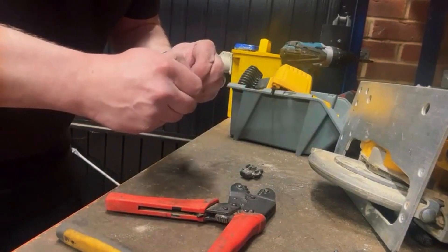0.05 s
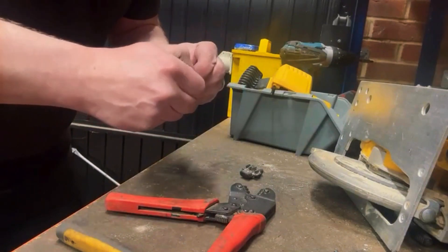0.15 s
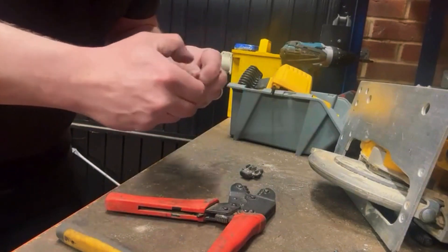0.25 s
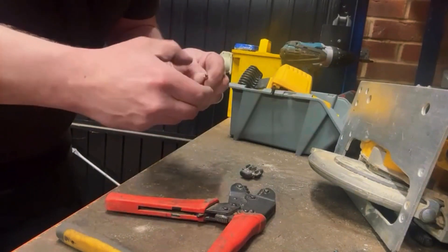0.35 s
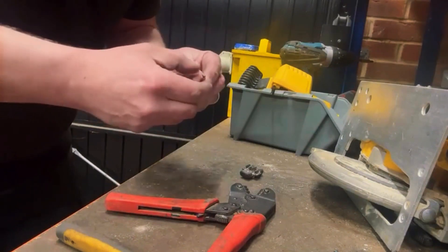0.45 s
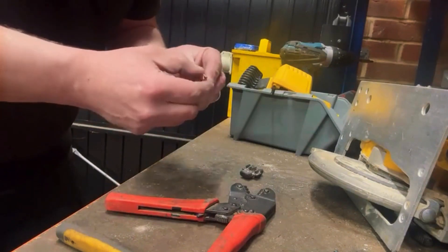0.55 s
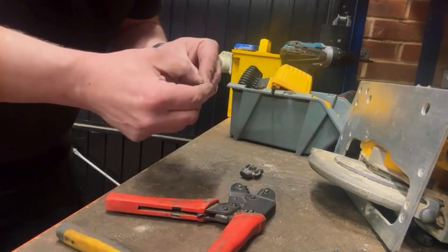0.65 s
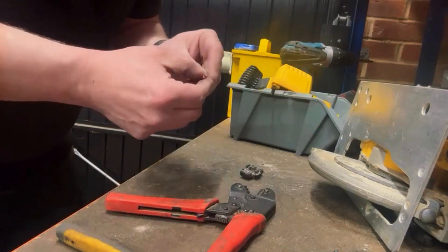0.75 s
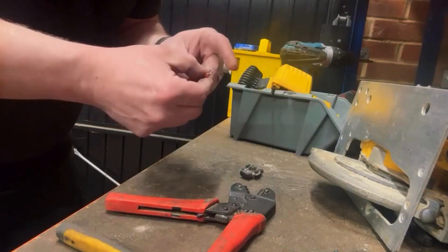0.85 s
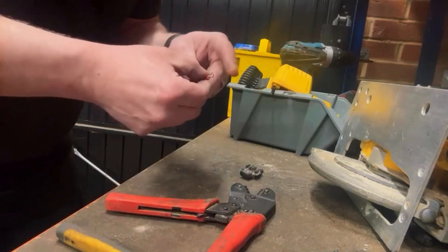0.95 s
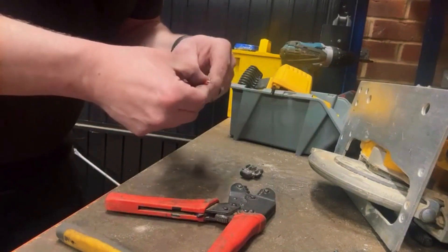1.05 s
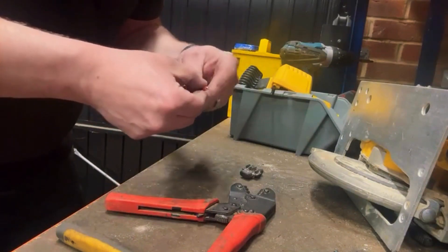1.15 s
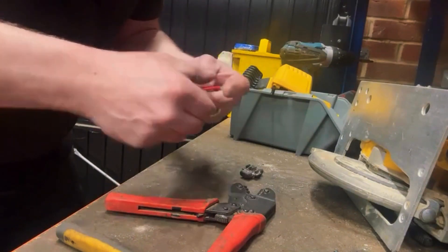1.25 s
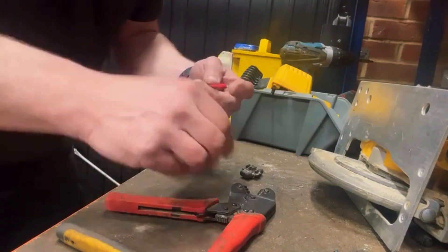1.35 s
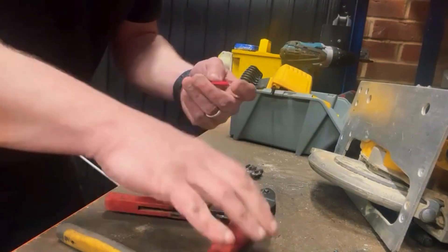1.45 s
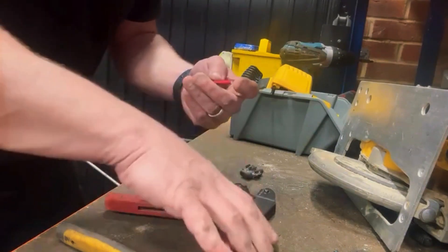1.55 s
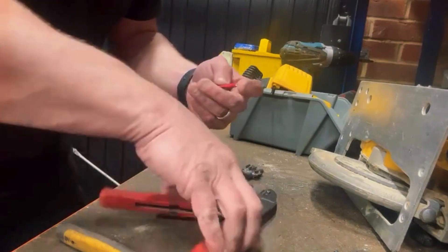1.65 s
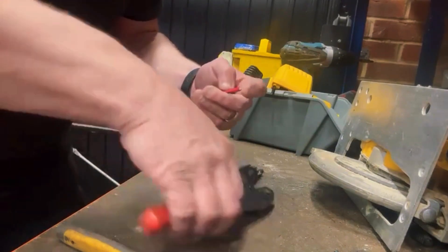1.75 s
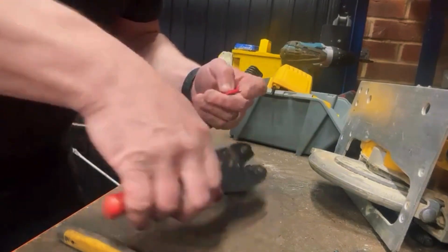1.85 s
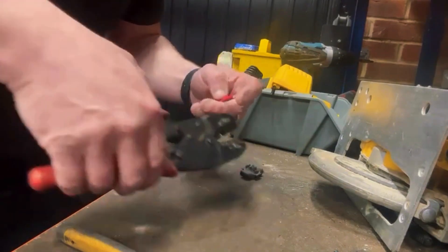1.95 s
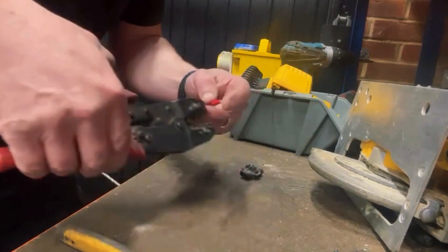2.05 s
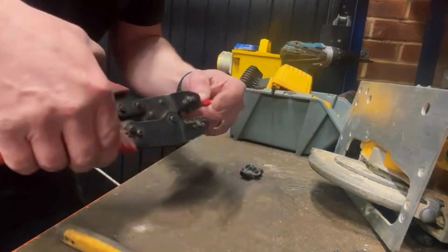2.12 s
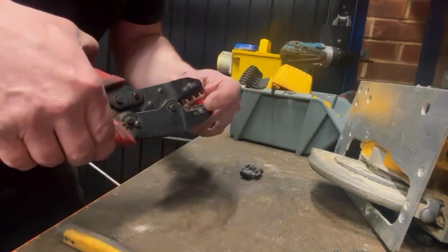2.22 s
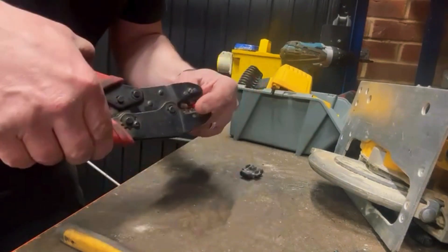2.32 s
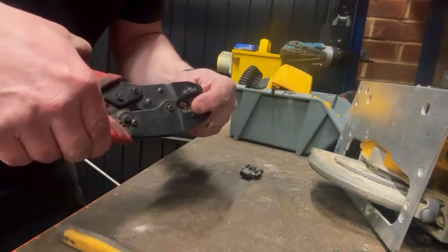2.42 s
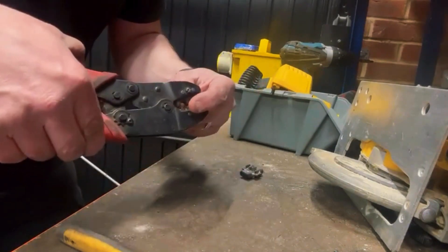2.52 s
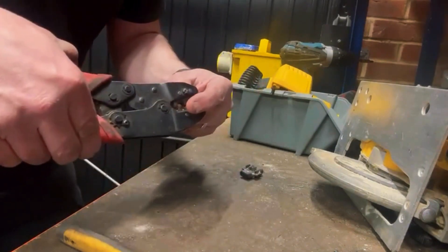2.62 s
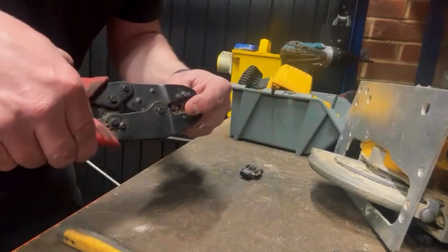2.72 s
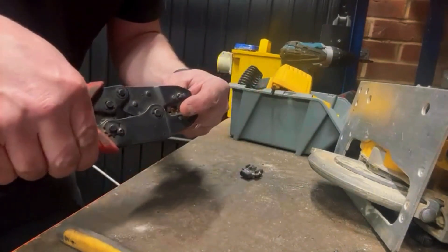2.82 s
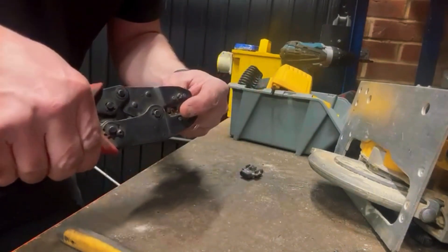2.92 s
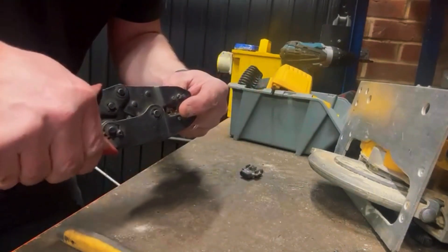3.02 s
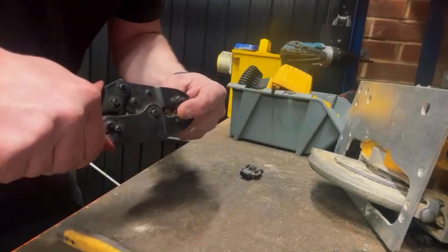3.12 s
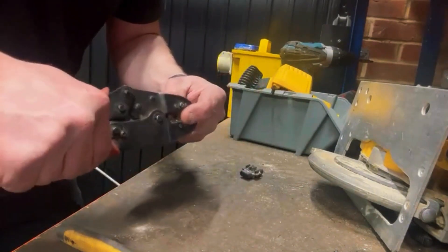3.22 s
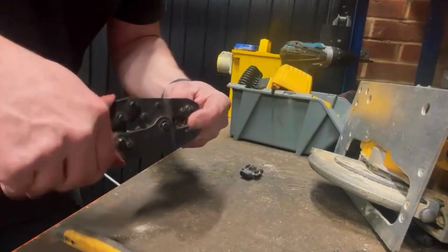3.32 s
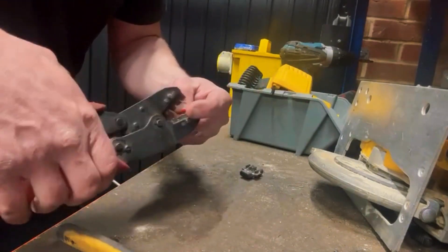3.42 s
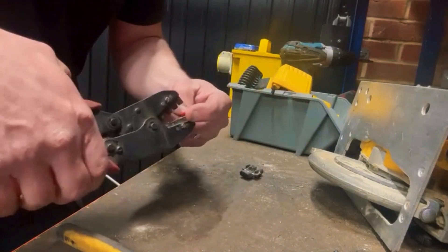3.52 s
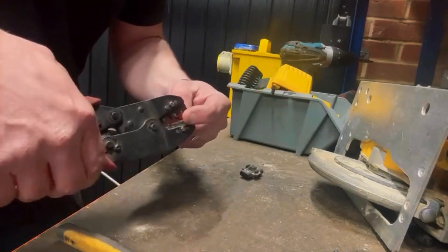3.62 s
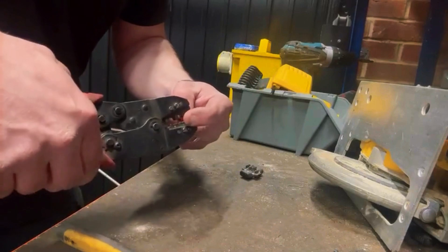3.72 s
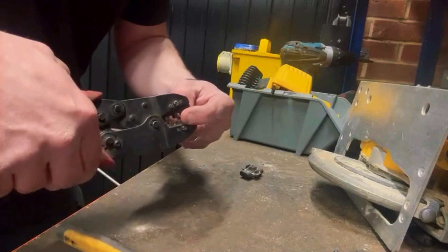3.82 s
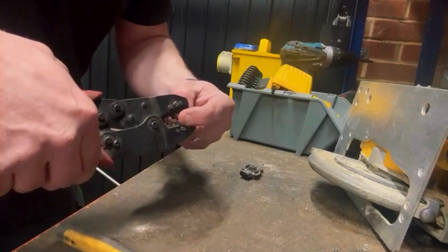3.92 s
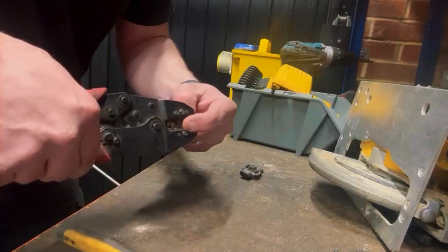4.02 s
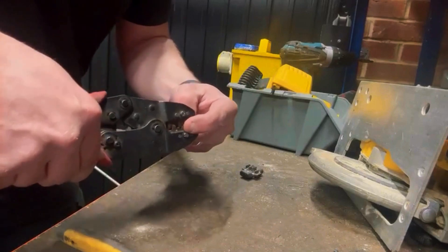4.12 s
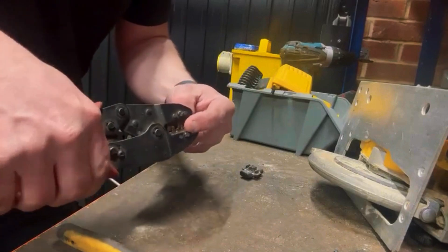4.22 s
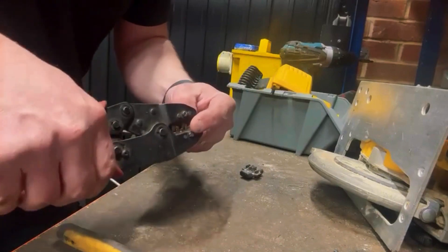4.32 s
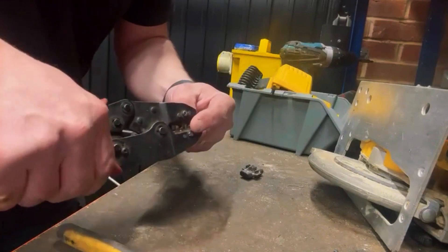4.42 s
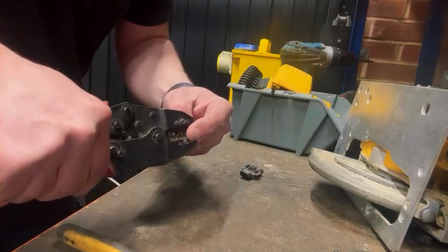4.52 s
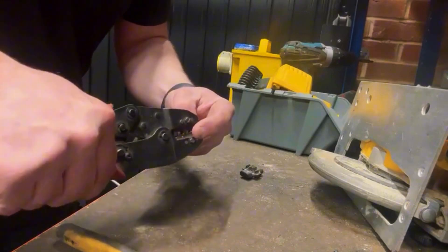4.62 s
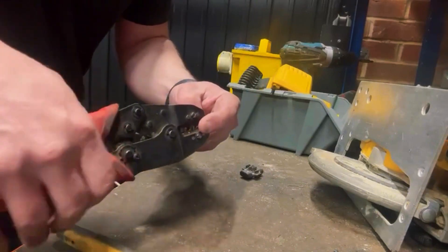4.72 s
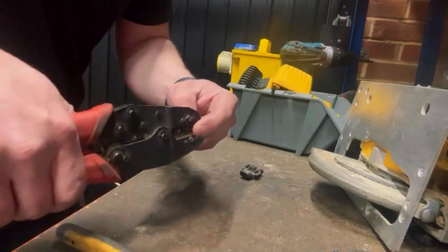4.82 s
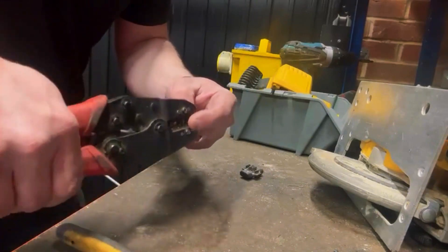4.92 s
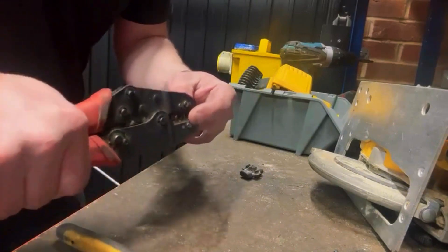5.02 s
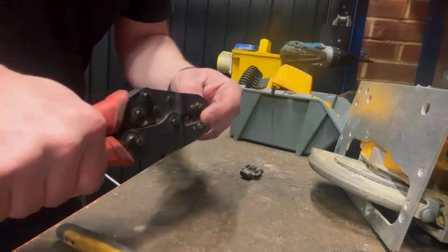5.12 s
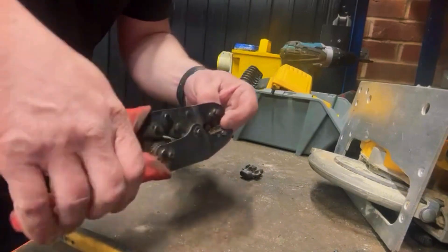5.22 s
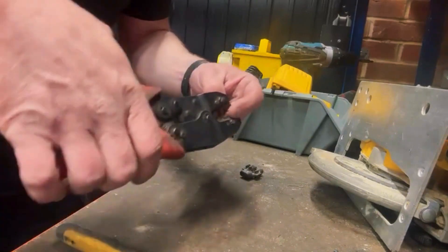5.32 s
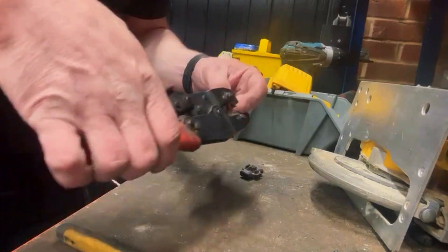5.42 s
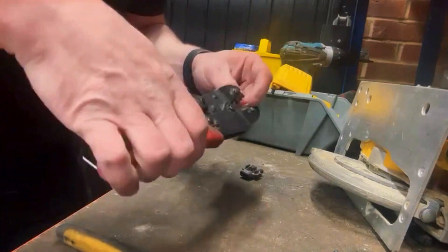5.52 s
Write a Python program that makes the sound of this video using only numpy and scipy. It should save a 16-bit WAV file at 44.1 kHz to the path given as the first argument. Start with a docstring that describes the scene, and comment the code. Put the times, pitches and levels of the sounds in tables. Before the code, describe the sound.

Crimping pliers knock and scrape on a workbench, then their ratchet clicks sharply in quick runs and the jaws clunk shut.

```python
"""In a small workshop, crimping pliers knock on a bench, are dragged off it and squeeze a wire terminal.
Their ratchet has a small catch, the pawl, which snaps over teeth in quick runs and makes the steel ring.
The return spring hums, and the jaws close with a clunk. Behind this are the hiss of a slipping grip,
the rumble of moving arms and the room's echo. The microphone is close, with the tool nearer its right."""
import sys
import numpy as np
from scipy import signal
from scipy.fft import rfft, irfft, next_fast_len
from scipy.io import wavfile

SR = 44100
rng = np.random.default_rng(int(sys.argv[2]) if len(sys.argv) > 2 else 0)


def bounce(signal):
    """Save signal as a 16-bit WAV file at the path given by the first command-line argument."""
    frames = np.transpose(np.atleast_2d(signal))
    limited = np.clip(frames, -1, 1)
    pcm = np.round(limited * 32767).astype(np.int16)
    wavfile.write(sys.argv[1], SR, pcm)


N = 245004

# runs of the pawl over its teeth: (start [s], teeth [count], first gap [s], gap over the last gap [ratio],
# level [dB], change per tooth [dB], body [dB], brightness [dB]); body is the lower part of the tone
PAWL_RUNS = [(2.5959, 3, 0.067, 0.55, -9.5, 1, -0.5, -11), (2.9655, 4, 0.0405, 0.925, -13, 2, 2, -4.5),
             (3.3299, 8, 0.006, 1.065, -7, -0.49, -1, -7.5),
             (3.9313, 4, 0.0177, 0.905, -7.5, 0.14, -1.5, -10),
             (5.2732, 4, 0.0248, 0.91, -8, -0.53, 0, -6.5)]
# single clicks of the pawl and its links: (time [s], level [dB], brightness [dB])
LONE_CLICKS = [(2.1602, -50.5, -24), (2.2957, -45, -2.5), (2.46, -47, -14.5), (2.8926, -15.5, -7),
               (3.268, -28.5, -8), (3.5935, -39.5, -13), (4.203, -34.5, -11.5), (4.2898, -43.5, -12),
               (4.3193, -6.5, -12), (4.4046, -15, -1.5), (4.6111, -44, -15.5), (4.9414, -9, -4),
               (4.9748, -9, -2.5), (5.1394, -19, -6.5), (5.2022, -8, 0), (5.2172, -8.5, -7.5),
               (5.4415, -8, -8), (5.5349, -25, -5.5)]
# tone of a snap's first crack, and of the short clang after it: (frequency [Hz], level [dB])
CRACK_TONE = [(100, -35), (700, -35), (1300, -14.5), (1900, -28), (2600, -12.5), (3200, 1.5), (4200, -1.5),
              (6000, -1), (6700, -1), (7500, -21.5), (8600, -10.5), (10500, -5.5), (11600, -13.5),
              (12600, -27)]
CLANG_TONE = [(100, -33), (700, -28), (1300, -15), (2000, -13), (2800, -10.5), (3300, -8.5), (4300, 1),
              (4850, -4.5), (5800, 0), (6600, -11.5), (7400, -18.5), (8800, -8.5), (11300, -9),
              (12500, -35.5)]
# notes of the steel plates, the spring, the whole tool and the bench top:
# (frequency [Hz], level [dB], time to fade by 60 dB [s])
PLATE_NOTES = [(1550, -17, .05), (2313, -12, .09), (3169, -4, .05), (3571, -2, .06), (3871, -3, .07),
               (3931, 0, .08), (4102, -1, .09), (4342, 0, .09), (4808, -6, .07), (5008, -4, .08),
               (5254, -5, .08), (5740, -3, .07), (5996, 0, .08), (6390, -7, .08), (9009, -10, .07),
               (9170, -10, .07), (9611, -9, .06)]
SPRING_NOTES = [(743, 0, 1.5), (1475, -8, .45), (2229, 0, .4), (2961, -3, .4)]
TOOL_NOTES = [(154, -16, .09), (224, -19, 0.048), (347, -10, 0.06), (474, -9, 0.043), (651, -5, 0.025),
              (1180, -8, 0.06), (1124, -4, 0.044), (1410, -13.5, 0.04), (1647, -16, 0.023),
              (2190, -11, .05), (2470, -10, 0.035)]
BENCH_NOTES = [(102, -3, .2), (140, -4, .07), (180, -3, .08), (227, -5.5, .13), (271, -4.5, .11),
               (315, -3, .05), (398, 2.5, .1), (445, -2, .05), (555, 2.5, .05), (675, 2, .045),
               (770, 3, .05), (894, -2, .04), (1190, -10, .06), (1400, -13, .04), (1850, -13, .04),
               (2150, -13, .04)]
# jolts that set the spring humming: (time [s], level [dB])
SPRING_JOLTS = [(2.596, -59), (3.966, -60), (4.404, -68)]
# the jaws reach their stop: (time [s], level [dB], bass [dB])
JAW_CLUNKS = [(3.101, -24, -15.5), (4.974, -31, -4.5), (4.982, -23, 4), (5.095, -39, -8.5)]
# knocks on the bench: (time [s], level [dB], contact time [ms], scrape level [dB])
BENCH_KNOCKS = [(1.469, -16.5, 8.5, -56.5), (1.479, -16.5, 7.7, -72), (1.5082, -18.5, 1.5, -62),
                (1.516, -18.5, 0.87, -71), (1.529, -22.5, 1.7, -66), (1.556, -29, 2, -50.5),
                (1.675, -33, 0.6, -44.5), (1.71, -32.5, 0.6, -45)]
# the grip slips on the handles: (start [s], length [s], level [dB])
GRIP_SLIPS = [(4.652, 0.125, -58), (4.845, 0.04, -63.5)]
# swells of rumble as the arms move: (middle [s], length [s], level [dB])
ARM_MOVES = [(0.74, 0.21, -58.5), (1.178, 0.19, -56), (1.81, 0.41, -54.5), (3.15, 0.6, -58.5),
             (4.942, 0.33, -60.5), (5.159, 0.037, -49.5), (5.506, 0.14, -57)]
# tone of the sliding tool, slipping palm, arm rumble, still air and echo: (frequency [Hz], level [dB])
SLIDE_TONE = [(410, -26.5), (700, -4), (808, -13.5), (956, -19), (2990, -17), (6360, -8.5), (7340, -21.5),
              (11300, -19), (12300, -43), (16000, -65), (22000, -120)]
SLIP_TONE = [(1000, -7), (2500, -8.5), (4000, -3.5), (6000, 2.5), (7400, -13.5), (9500, -4.5),
             (11300, -4.5), (12300, -42.5)]
RUMBLE_TONE = [(20, -21), (40, -11), (60, -4.5), (100, -10.5), (160, -16.5), (300, -25.5), (800, -58.5),
               (8000, -100)]
AIR_TONE = [(20, -8), (60, 0), (160, -1), (300, -5), (410, 0), (560, -11), (750, -13), (1050, -8),
            (1600, -20), (3000, -27), (6000, -30), (11000, -28), (12500, -42)]
ECHO_TONE = [(100, -7.5), (500, -2.5), (1500, 0), (3000, -2.5), (5000, -4), (7400, 0), (10000, -3.5),
             (11300, -4.5), (12300, -18)]
# how long the echo lasts: (frequency [Hz], time to fade by 60 dB [s])
ECHO_FADE = [(100, 0.41), (400, 0.5), (1500, 0.3), (4000, 0.28), (7000, 0.27), (11000, 0.26)]
# what the microphone's left side hears, against its right: (frequency [Hz], level [dB], phase lead [rad])
TOOL_AT_LEFT = [(100, -4.5, 1.5), (630, -0.5, 1.05), (1130, -6, 0.9), (2030, -5, -1.5), (2700, -9.5, -2.5),
                (3870, -12.5, 2.63), (4600, -17, -3), (5900, -11.5, -0.72), (6700, -8, -2.34), (7130, 0, 0),
                (10700, 0.5, 2.1)]
BENCH_AT_LEFT = [(60, -5, -1), (100, -5.5, -1.3), (160, -7, -1.6), (250, -10, -2.3), (400, -14, -1.1),
                 (530, -3, -3.2), (760, -4, -3.2), (1130, -5, -4.2), (2060, -7.5, -7), (4000, -14, -8.3),
                 (6430, -7, -7), (9000, 1, -6.3)]
# the microphone's loss of treble: (frequency [Hz], level [dB])
MICROPHONE_TONE = [(11600, 0), (12600, -10), (16000, -26)]

BODY_DB, BODY_SLOPE = -5, 0.32  # body of a full-strength click; extra dB of body per dB it is quieter
STOP_DB, STOP_BODY_DB, STOP_BRIGHT_DB = 6.5, 15.5, -13  # dull snap at the stop; its level adds to the clunk's
DRAG_START_S, DRAG_END_S = 1.606, 1.706  # the tool slides at full speed between these times
DRAG_RISE_DB_PER_S, DRAG_FALL_DB_PER_S = 92, 265  # it speeds up slowly, then lifts off quickly
RATTLE_RISE_S, RATTLE_FALL_DB_PER_S = 0.004, 261  # after each knock the tool rattles to rest
TAPS = 4096  # samples used to build a tone filter


def ratchet(ring_spread_db=1.5):
    """The pawl snaps over the teeth; the steel rings a little more or less each time."""
    out = np.zeros((2, N))
    for s, db, body_db, bright_db in snap_times():
        ring_db = ring_spread_db * rng.standard_normal()
        add(out, s - 0.01, gain_of(db) * snap(body_db, bright_db, ring_db))
    return out


def snap_times():
    """Lists every snap as (time [s], level [dB], body [dB], brightness [dB])."""
    for s, count, gap_s, gap_ratio, db, swell_db, body_db, bright_db in PAWL_RUNS:
        for k in range(round(count)):
            yield s, db + k * swell_db, body_db, bright_db
            s += gap_s * gap_ratio ** k
    for s, db, bright_db in LONE_CLICKS:
        yield s, db, BODY_DB - BODY_SLOPE * db, bright_db
    for s, db, _ in JAW_CLUNKS:
        yield s, db + STOP_DB, STOP_BODY_DB, STOP_BRIGHT_DB


def snap(body_db, bright_db, ring_db, crack_db=14, clang_db=11.5, plates_db=-24,
         chatter_s=0.00033, slip_db=-26, slip_s=0.0047, clang_fade_s=0.041):
    """The pawl slips up one tooth, cracks down on the next and sets the steel ringing."""
    t = (np.arange(2 * TAPS) - SR // 100) / SR  # the crack comes 10 ms in, at t = 0
    slip = gain_of(slip_db) * np.exp(-abs(t) / slip_s) * (t < 0)
    chatter = np.exp(-abs(t) / chatter_s)
    contact = (slip + chatter) * rng.standard_normal(len(t))
    crack = gain_of(crack_db) * unit_energy(shape_tone(contact, CRACK_TONE))
    burst = stereo_noise(len(t), 0.29) * gain_of(-60 * abs(t) / clang_fade_s) * (t > 0)
    clang = gain_of(clang_db + ring_db) * unit_energy(shape_tone(burst, CLANG_TONE))
    detune = rng.uniform(.995, 1.005)
    plates = gain_of(plates_db) * ringing(PLATE_NOTES, np.maximum(t, 0) * detune, spread_db=4.5)
    # where the pawl lands sets the amount of body and treble
    hz = np.geomspace(1000, 12000, 48)
    landing_db = look_up([(1700, body_db), (3000, 0.0026), (6500, 0.0042), (8300, bright_db + 7)], hz)
    # the links shift from tooth to tooth, so each snap favours other pitches
    tooth_db = 2.3 * rng.standard_normal(len(hz))
    return shape_tone(crack + clang + plates, np.transpose([hz, landing_db + tooth_db]))


def spring():
    """Each jolt leaves the return spring with a long, faint hum."""
    out, t = np.zeros((2, N)), np.arange(SR) / SR
    for s, db in SPRING_JOLTS:
        add(out, s, gain_of(db) * ringing(SPRING_NOTES, t, spread_db=1)[None])
    return out


def jaws(rise_s=0.0012):
    """The jaws hit their stop, and the whole tool takes a dull blow."""
    out, t = np.zeros((2, N)), np.arange(2 * TAPS) / SR
    for s, db, bass_db in JAW_CLUNKS:
        blow = ringing(TOOL_NOTES, t, spread_db=2.5) * (1 - np.exp(-t / rise_s))
        add(out, s, gain_of(db) * shape_tone(blow, [(200, bass_db), (600, 0.0089)]))
    return out


def bench(knock_db=-3, judder_db=-34, hiss_db=-51, rattle_db=-7):
    """Hand and tool knock the bench top, then the tool judders and hisses across it."""
    t, clock = np.arange(SR // 2) / SR, np.arange(N) / SR
    bench_ring = sum(gain_of(db - 60 * t / fade_s) * np.cos(2 * np.pi * hz * t)
                     for hz, db, fade_s in BENCH_NOTES)
    rise_db = -DRAG_RISE_DB_PER_S * np.maximum(DRAG_START_S - clock, 0)
    fall_db = -DRAG_FALL_DB_PER_S * np.maximum(clock - DRAG_END_S, 0)
    drag = gain_of(rise_db + fall_db) * (clock > BENCH_KNOCKS[0][0])
    force = np.zeros((2, N))
    shake, rub = gain_of(judder_db) * drag, gain_of(hiss_db) * drag
    for s, db, contact_ms, scrape_db in BENCH_KNOCKS:
        progress = t * 4000 / contact_ms  # a longer contact gives a duller knock
        push = progress * np.exp(-progress)
        add(force, s, gain_of(db + knock_db) * push[None] / push.sum())
        onset = np.clip((clock - s) / RATTLE_RISE_S, 0, 1)
        rattle = onset * gain_of(-RATTLE_FALL_DB_PER_S * abs(clock - s))
        shake = np.hypot(shake, gain_of(db + rattle_db) * rattle / contact_ms)
        rub = np.hypot(rub, gain_of(scrape_db) * rattle)
    knocks = signal.fftconvolve(force, bench_ring[None], axes=1)[:, :N]
    grit = rng.standard_normal(N) * grain(4)
    judder_tone = [(40, 10), (100, 2.5), (400, -2), (750, -4), (1300, -14), (2000, -17), (5000, -36)]
    judder = unit_level(shape_tone(signal.fftconvolve(grit, bench_ring)[:N], judder_tone))
    hiss = unit_level(shape_tone(grit * stereo_noise(N, 0.3), SLIDE_TONE))
    return knocks + judder * shake + hiss * rub


def grip(edge_s=0.0076):
    """The palm slips over the plastic handles with a soft, grainy hiss."""
    clock, level = np.arange(N) / SR, np.zeros(N)
    for s, length, db in GRIP_SLIPS:
        outside_s = np.maximum(abs(clock - s - length / 2) - length / 2, 0)
        level += gain_of(db) * np.exp(-outside_s / edge_s)
    grit = stereo_noise(N, 0.6) * grain(2)
    return level * unit_level(shape_tone(grit, SLIP_TONE))


def arms(hold_db=-65):
    """Hands holding the tool make a low rumble that swells as the arms move."""
    clock = np.arange(N) / SR
    swells = sum(gain_of(db) ** 2 * np.exp(-(2 * (clock - s) / length) ** 4)
                 for s, length, db in ARM_MOVES)
    rumble = unit_level(shape_tone(stereo_noise(N, 0.77), RUMBLE_TONE))
    return np.sqrt(gain_of(hold_db) ** 2 + swells) * rumble * pan(left_db=-7.5)


def air(level_db=-68):
    """The steady hush of still workshop air."""
    hush = unit_level(shape_tone(stereo_noise(N, .7), AIR_TONE))
    return gain_of(level_db) * hush * pan(left_db=-1)


def echo(x, build_up_s=0.0072):
    """Sound bounces off bench, shelves and walls; each pitch fades at its own speed."""
    hz, t, spectrum = signal.stft(stereo_noise(SR // 2, 0.59), SR, nperseg=256)
    fade = gain_of(-60 * t / look_up(ECHO_FADE, hz)[:, None])
    tail = signal.istft(spectrum * fade, SR, nperseg=256)[1]
    tail *= np.clip(np.arange(tail.shape[1]) / SR / build_up_s - .5, 0, 1)
    return signal.fftconvolve(x[1:], shape_tone(unit_energy(tail), ECHO_TONE), axes=1)[:, :N]


def shade_left(x, at_left):
    """The microphone's body shades and delays its left side, differently at each pitch."""
    size = next_fast_len(N + TAPS)
    hz, table = np.fft.rfftfreq(size, 1 / SR), np.array(at_left)
    gain, phase = gain_of(look_up(table[:, :2], hz)), look_up(table[:, ::2], hz)
    left = irfft(rfft(x[0], size) * gain * np.exp(1j * phase), size)[:N]
    return np.array([left, x[1]])


def ringing(notes, t, spread_db):
    """A struck object's fading notes; each blow shares its energy among them differently."""
    hz, db, fade_s = np.transpose(notes)[:, :, None]
    strength = gain_of(db + spread_db * rng.standard_normal(hz.shape)) * rng.choice([-1, 1], hz.shape)
    return np.sum(strength * gain_of(-60 * t / fade_s) * np.sin(2 * np.pi * hz * t), axis=0)


def grain(depth_db):
    """Random jumps in level that make a hiss gritty."""
    return gain_of(depth_db * np.minimum(rng.exponential(1, N), 5))


def stereo_noise(size, alike):
    """White noise whose two sides are unrelated (alike = 0) up to identical (1)."""
    shared, own = rng.standard_normal((2, size))
    return np.array([alike * shared + np.sqrt(1 - alike ** 2) * own, shared])


def shape_tone(x, points):
    """Filters by (frequency [Hz], level [dB]) points, keeping sudden starts sharp."""
    log_gain = np.log(gain_of(look_up(points, abs(np.fft.fftfreq(TAPS, 1 / SR)))))
    response = np.exp(np.conj(signal.hilbert(log_gain)))
    kernel = np.fft.ifft(response).real[:TAPS // 2]
    return signal.oaconvolve(np.atleast_2d(x), kernel[None], axes=1)[:, :x.shape[-1]]


def look_up(points, hz):
    """Reads between (frequency [Hz], value) points along a pitch scale."""
    point_hz, value = np.transpose(points)
    return np.interp(np.log(hz + 1), np.log(point_hz + 1), value)


def add(mix, s, sound):
    """Lays a sound into both sides of the mix at time s."""
    part = mix[:, round(s * SR):][:, :sound.shape[-1]]
    part += sound[:, :part.shape[-1]]


def pan(left_db):
    """Sets the left side against the right, keeping the total power."""
    return unit_energy(np.array([gain_of(left_db), 1]))[:, None]


def gain_of(db):
    """Turns decibels into a multiplier."""
    return 10 ** (np.asarray(db) / 20)


def unit_level(x):
    """Scales the average power to 1."""
    return x / np.sqrt(np.mean(x ** 2) + 1e-20)


def unit_energy(x):
    """Scales each row's energy to 1."""
    return x / np.sqrt(np.sum(x ** 2, axis=-1, keepdims=True) + 1e-20)


def scene(tool_echo_db=-10, bench_echo_db=-13):
    """Tool and bench, each with its echo, reach the microphone over a quiet background."""
    tool = ratchet() + spring() + jaws() + grip()
    knocks = bench()
    tool = shade_left(tool + gain_of(tool_echo_db) * echo(tool), TOOL_AT_LEFT)
    knocks = shade_left(knocks + gain_of(bench_echo_db) * echo(knocks), BENCH_AT_LEFT)
    return tool + knocks + air() + arms()


def record(dry, ceiling=.85, cutoff_hz=16100):
    """Rounds off the loudest peaks, softens the treble and cuts the very highest pitches."""
    rounded = dry / (1 + (dry / ceiling) ** 4) ** .25
    low_pass = signal.firwin(511, cutoff_hz, window=("kaiser", 9), fs=SR)
    return signal.oaconvolve(shape_tone(rounded, MICROPHONE_TONE), low_pass[None], "same")


dry = scene()
out = record(dry)
bounce(out)
```